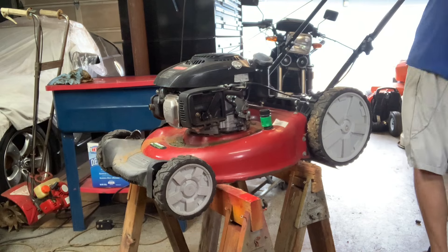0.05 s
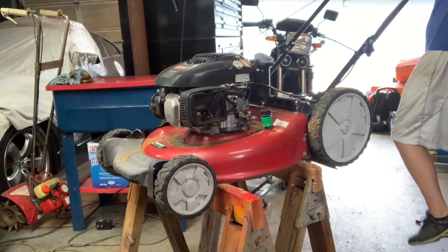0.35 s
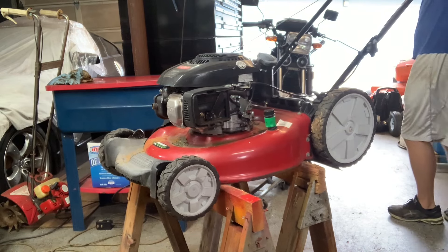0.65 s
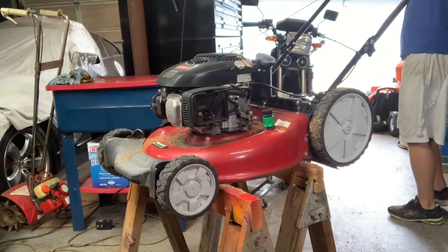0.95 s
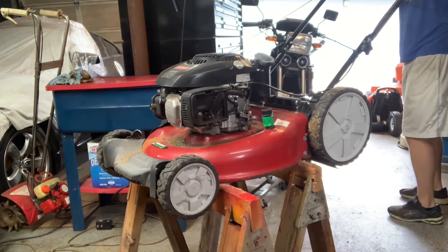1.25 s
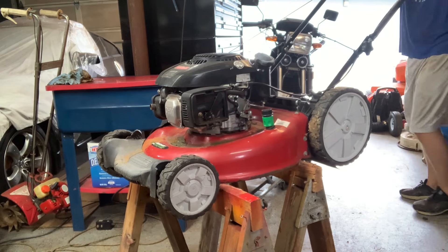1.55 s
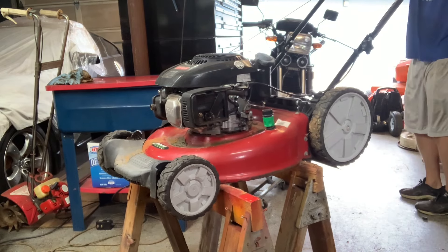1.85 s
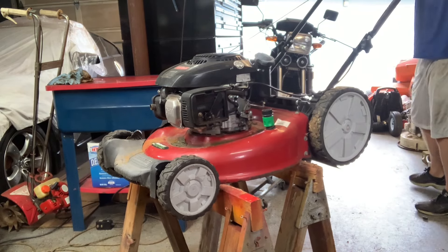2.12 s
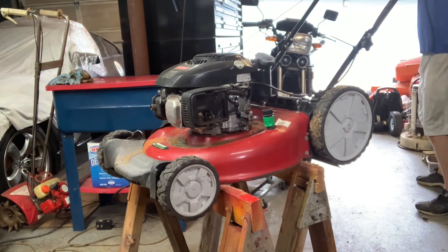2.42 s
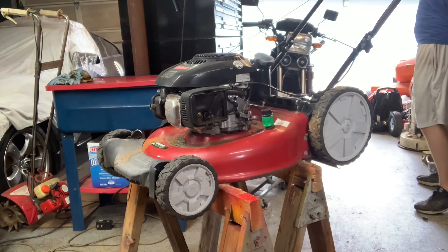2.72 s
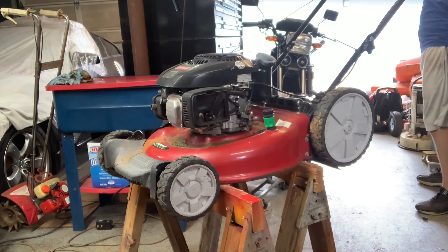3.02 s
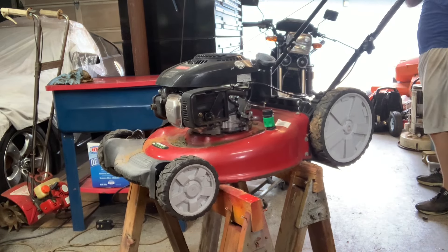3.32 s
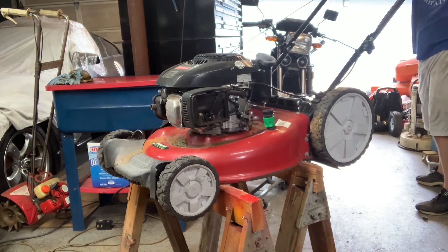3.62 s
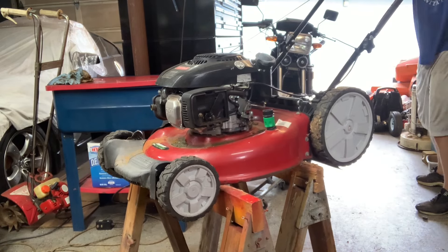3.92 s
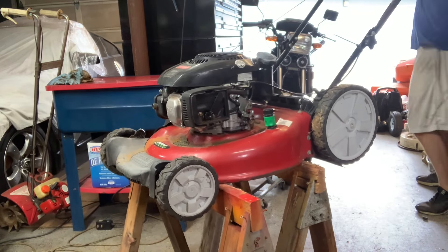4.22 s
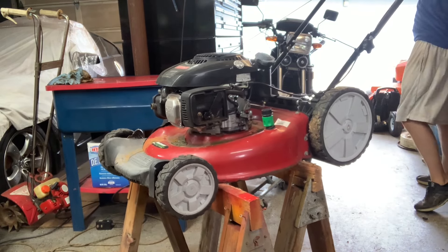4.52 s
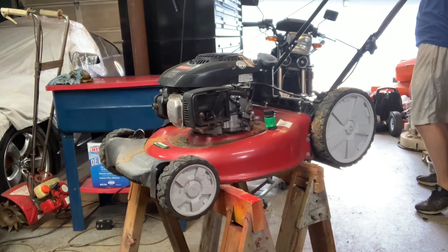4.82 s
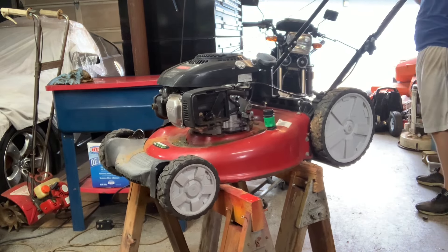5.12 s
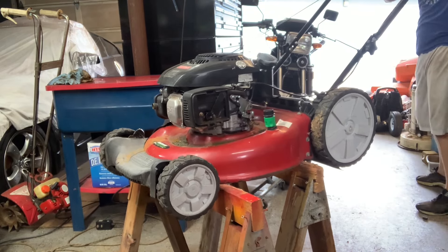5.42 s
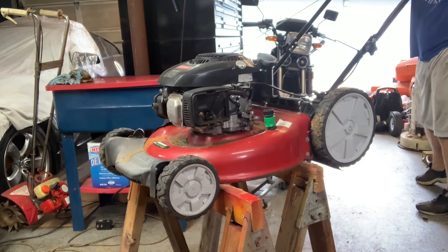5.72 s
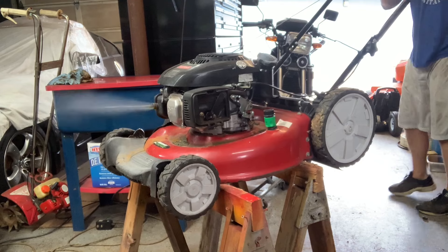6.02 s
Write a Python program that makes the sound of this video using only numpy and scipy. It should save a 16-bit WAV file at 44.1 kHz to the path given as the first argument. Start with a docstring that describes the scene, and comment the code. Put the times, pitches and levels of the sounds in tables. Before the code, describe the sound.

In a garage, feet shuffle softly while a push mower's handle bar squeaks and clacks. A pull on the starter rope spins the small engine through a few rasping, knocking turns before it coasts to a stop. With a sharp click, a second pull follows; the engine fires and speeds up, puffing and rattling its steel deck. It sounds close, with a short room echo and a faint low drone.

```python
"""A push mower on sawhorses in a garage, over a low drone. Hands and feet shuffle; the safety bail
squeaks and clacks against the handle. At 2.5 s a rope pull spins the engine, which coasts to a stop.
At 4 s the starter catches again; on the second pull the engine fires and gathers speed.
Each turn brings knocks at fixed crank angles, a puff of gas and a rasp. The shaking grows with speed,
and the steel deck rings."""
import sys
import numpy as np
from scipy import signal
from scipy.fft import rfft, irfft, next_fast_len
from scipy.io import wavfile
from scipy.ndimage import uniform_filter1d

SR = 44100
rng = np.random.default_rng(int(sys.argv[2]) if len(sys.argv) > 2 else 0)


def write(x):
    x = np.atleast_2d(x).T
    wavfile.write(sys.argv[1], SR, np.round(np.clip(x, -1, 1) * 32767).astype(np.int16))


N = 271215

# Crankshaft turns. Each row: end in seconds, strength in dB.
TURNS = [(2.4, -41), (2.5708, -20.5), (2.732, -18.5), (2.9136, -23), (3.166, -29), (3.542, -38.5),
         (4.135, -30.5), (4.3075, -20), (4.4484, -18), (4.6162, -20.5), (4.797, -22.5), (4.9867, -22),
         (5.157, -18.5), (5.3041, -18.5), (5.448, -19), (5.602, -18.5), (5.701, -16), (5.8, -18),
         (5.8936, -17), (5.9793, -17), (6.0595, -16.5), (6.138, -18.5)]
# Knocks in a turn. Each row: share of the turn, relative level in dB, pitch in Hz, relative thud in dB.
KNOCKS = [(.14, -16, 616, -17), (.37, -4, 1423, -11), (.63, -8.5, 602, -9.5), (.868, -1, 950, -8)]
# Hard compression strokes. Each row: time in seconds, clatter in dB, exhaust in dB.
STROKES = [(2.6696, -18.5, -31), (3.045, -45, -35), (3.3783, -45, -42), (4.394, -13.5, -28),
           (4.716, -22, -25), (5.0933, -16, -21.5), (5.3862, -14, -19.5), (5.6564, -10, -21.5),
           (5.852, -9, -17.5), (6.0234, -9.5, -16)]
# Crankshaft at rest before each pull. Each entry: time in seconds.
REST_TIMES_S = [2.16, 3.93]
# Muffler modes. Each row: frequency in Hz, relative level in dB, t60 in seconds.
MUFFLER_MODES = [(71.8, 0, 0.24), (139.4, -17.5, 0.24), (208, -10.5, 0.16), (309.7, -9, 0.16)]
# Deck and shroud modes. Each row: frequency in Hz, width in Hz, twice the gain in dB.
DECK_MODES = [(277, 130, -9), (554, 56, -1.5), (760, 39, -19), (1181, 26, 4), (1404, 63, -11.5),
              (1700, 91, -5), (2310, 16, -51), (2508, 14, 7), (3093, 17, 2), (3220, 14, -18),
              (3570, 61, -36), (3820, 39, -17), (4380, 51, 7), (4870, 88, -5)]
# Rope pulls. Each row: time of full draw, rise and hold in seconds, level in dB.
PULLS = [(2.51, 0.15, 0.19, -40), (4.166, 0.13, 0.25, -38)]
# Starter pawl and valve clicks. Each row: time in seconds, level in dB, relative ring level in dB.
CLICKS = [(1.826, -34, -10), (1.891, -38, 1), (1.932, -40.5, -5), (2.4907, -29, -20), (3.987, -16.5, -2),
          (4.108, -29.5, -15), (4.232, -22.5, -14)]
# Handling and engine clunks. Each row: time in seconds, level in dB, pitch in Hz, brightness in dB.
CLUNKS = [(.011, -35.5, 670, -17), (.13, -43, 510, -7.5), (.465, -35, 637, -10.5), (.576, -19, 633.4, -5),
          (.587, -22.5, 699, -18), (0.814, -41, 1120, -1.5), (.872, -47, 1000, -2.5),
          (.954, -22, 1200, -15.5), (.963, -24, 846, -14.5), (1.006, -38, 1310, -3),
          (1.043, -30.5, 749, -17), (1.13, -44, 1050, -25), (1.309, -53.5, 630, -6), (1.616, -38, 994, -11),
          (2.034, -40.5, 773, -16.5), (2.672, -16, 1660, -14), (3.244, -42.5, 1205, 2.5),
          (4.873, -19, 758, -16.5), (5.076, -18.5, 743, -14), (5.5754, -22, 966, 3),
          (5.598, -14, 1377, -12), (5.648, -13.5, 566, -12), (5.668, -17.5, 535, -15)]
# Dry pivots and rope. Each row: start and length in seconds, pitch in Hz, scatter share, level in dB.
SQUEAKS = [(0.125, 0.025, 6480, 0.013, -32.5), (0.139, 0.062, 6380, 0.0069, -43.5),
           (0.478, 0.089, 3920, 0.032, -44.5), (0.505, 0.051, 4540, .026, -35.5),
           (0.532, 0.065, 4640, 0.017, -41), (0.885, 0.097, 1080, 0.045, -50),
           (1.376, 0.034, 1776, 0.025, -53.5), (2.241, 0.2, 3620, 0.024, -48.5),
           (3.598, 0.38, 3180, 0.13, -62)]
# Hands and feet. Each row: middle and length in seconds, level in dB.
SHUFFLES = [(.01, .1, -52.5), (0.195, 0.077, -51), (.5, 0.14, -44), (1.1, .11, -49.5),
            (1.385, 0.064, -57.5), (1.606, 0.062, -57), (1.98, 0.25, -54)]
# Low drone. Each row: time in seconds, level in dB.
DRONE_LEVELS = [(0, -53), (1.3, -55.5), (2.2, -51.5), (3.05, -45), (3.3, -50.5), (3.7, -50.5), (3.95, -57)]

# Noise spectra. Each row: frequency in Hz, relative density in dB.
THUD_SPECTRUM = [(70, -29), (135, -4), (180, -2.5), (270, 1.5), (400, -2), (540, 0), (750, -15),
                 (1500, -40)]
RATTLE_SPECTRUM = [(250, -31), (550, -0.5), (900, 4.5), (1400, -3.5), (1900, -3.5), (2500, -17),
                   (5000, -20)]
RING_SPECTRUM = [(700, -14), (1500, -2.5), (2300, -3.5), (3300, 1), (4600, -1.5), (5600, -12), (7000, -15),
                 (12000, -50)]
TREBLE_SPECTRUM = [(3000, -14), (5500, -6), (7500, -2.5), (8000, -1.5), (8600, 2), (10200, 0.5),
                   (12300, -2.5), (13800, -1.5), (15700, -7.5)]
RUMBLE_SPECTRUM = [(50, 3), (90, -8.5), (140, 5), (180, -3.5), (215, -3), (260, -1), (320, -0.5), (420, -5),
                   (600, -10.5), (1200, -35)]
SCUFF_SPECTRUM = [(250, -3.5), (400, -5), (500, 3.5), (650, -5), (1050, -9), (1500, -14.5), (1900, -16),
                  (2600, -22), (6000, -23.5), (15000, -29)]
DRONE_SPECTRUM = [(20, -20), (45, 3.5), (65, 7), (90, -7), (140, -5.5), (300, -46)]
AIR_SPECTRUM = [(80, -11), (150, 0), (330, 2.5), (700, -16), (1500, -16), (3000, -23), (8000, -29),
                (15000, -48)]
HOLLOW_SPECTRUM = [(120, -8), (250, -12), (340, 2.5), (420, -15), (520, -5), (750, -4.5), (1500, -36)]
PING_SPECTRUM = [(6500, -50), (7150, -7), (7330, -4), (7550, -5), (8200, -47)]

# Garage decay. Each row: frequency in Hz, t60 in seconds.
GARAGE_T60 = [(100, 0.78), (500, 0.16), (1500, 0.19), (4000, 0.29), (8000, 0.34), (15000, 0.23)]
# Stereo likeness. Each row: frequency in Hz, coherence from 0 to 1.
COHERENCE = [(60, .97), (400, .95), (1000, .9), (1800, .8), (2400, .62), (3500, .76), (5500, .45),
             (6500, .55), (7500, .92), (9400, .99), (10500, .88), (13300, .98), (15000, .9)]
# Stereo phase. Each row: frequency in Hz, lead of the left side in radians.
LEFT_LEAD = [(60, -.15), (400, -.17), (1700, -.35), (3000, -1.1), (3800, -.7), (5200, -1.9), (6800, -1),
             (7900, .2), (9400, 3.14), (11250, 6.2), (11650, 6.4), (13250, 9.4), (15000, 12.5),
             (15700, 12.9)]
# Stereo balance. Each row: frequency in Hz, left over right in dB.
BALANCE = [(60, 1.5), (250, 1), (1200, -2), (2200, -3), (3500, -0.5), (4800, -1.5), (8000, 0)]

CRANKING_HZ, FIRST_TURN_S, STALL_GAP_S = 6, .18, .45
KNOCK_SCATTER_OCTAVES, THUMP_LEAD_S, THUMP_HZ = 0.141, .002, 538.3
EXHAUST_LAG_S, INTAKE_LAG_S, INTAKE_TURN_SHARE = 0.0149, 0.02344, .47
RASP_TURN_SHARE = 0.052
RECOIL_DB_PER_S, CLICK_HZ = 40, 1703


def knocks():
    """Slack parts take up load at the same crank angles each turn; hard strokes add a thump."""
    rows = [(start + share * length, db + knock_db, hz * 2 ** rng.normal(0, KNOCK_SCATTER_OCTAVES), thud)
            for start, length, db in zip(*turns()) for share, knock_db, hz, thud in KNOCKS]
    rows += [(s - THUMP_LEAD_S, jolt_db(s, db) - 4, THUMP_HZ, -5) for s, db, _ in STROKES]
    s, db, pitch_hz, thud_db = np.transpose(rows)
    thud = blows(s, db + thud_db - 3, rise_s=0.0093, t60_s=0.15) * noise(THUD_SPECTRUM, 2.5)
    return thud + clanks(s, db + .5, pitch_hz, spread_octaves=1.1, t60_s=0.071)


def rasps():
    """A rub over a fixed arc ends each turn, shorter and brighter with speed."""
    t = np.arange(N) / SR
    ring, treble = np.zeros(N), np.zeros(N)
    for s, db in TURNS:
        octaves = speed_octaves(s)
        width_s = RASP_TURN_SHARE / (CRANKING_HZ * 2 ** octaves)
        near = abs(t - s) < 8 * width_s
        swell = 1 / np.cosh((t[near] - s) / width_s)
        ring[near] += amp(db - 2.5) * swell
        treble[near] += amp(db - 4.5 + 8.4 * max(octaves, -.4)) * swell ** 1.3
    return ring * noise(RING_SPECTRUM, 1.5, 4.5) + treble * noise(TREBLE_SPECTRUM, 1, 6)


def clatters():
    """Loose sheet metal chatters under each hard stroke."""
    s, db, _ = np.transpose(STROKES)
    treble = blows(s, db - 3, rise_s=0.0028, t60_s=0.13) * noise(TREBLE_SPECTRUM, 3, 3.5)
    ring = blows(s, jolt_db(s, db) - 5.5, rise_s=0.0069, t60_s=0.11) * noise(RING_SPECTRUM, 3, 2.5)
    return treble + ring


def puffs():
    """Exhaust after hard strokes, intake on the other turns; each barks and rings the muffler."""
    t = np.arange(SR // 3) / SR
    rows = [(s + EXHAUST_LAG_S, db) for s, _, db in STROKES]
    for start, length, db in zip(*turns()):
        if not any(start < s < start + length for s, _, _ in STROKES):
            intake_s = start + INTAKE_TURN_SHARE * length + INTAKE_LAG_S
            rows.append((intake_s, db - 9 + 4.7 * speed_octaves(intake_s)))
    times_s, levels_db = np.transpose(rows)
    bark_db = levels_db - 11.5 + 5.5 * speed_octaves(times_s)
    out = blows(times_s, bark_db, rise_s=0.0036, t60_s=0.24) * noise(RUMBLE_SPECTRUM, 3, 3)
    attack = 1 - np.exp(-(t / 0.012) ** 2)
    for s, db in rows:
        detunes = 1 + 0.024 * rng.standard_normal(len(MUFFLER_MODES))
        boom = sum(amp(mode_db - 60 * t / t60_s) * np.sin(2 * np.pi * hz * detune * t)
                   for (hz, mode_db, t60_s), detune in zip(MUFFLER_MODES, detunes))
        add(out[0], s - .004, amp(db + 5) * attack * boom)
    return out


def shaking():
    """Rumble, rattle and hiss grow with engine speed; the running rope adds to all three."""
    t = np.arange(N) / SR
    octaves, rope = speed_octaves(t), rope_gain(t)

    def gain(db, db_per_octave, rope_db):
        return np.hypot(amp(db + db_per_octave * octaves), amp(rope_db) * rope)

    rumble = gain(-39, 12, rope_db=-5) * amp(0.77 * wobble(40)) * noise(RUMBLE_SPECTRUM, 2, 1.5)
    rattle = gain(-39, 10, rope_db=3.5) * amp(2.3 * wobble(70)) * noise(RATTLE_SPECTRUM, 3.5, 3.5)
    fizz = noise(RING_SPECTRUM, 0, 6) + amp(-3) * noise(TREBLE_SPECTRUM, 4.5, 9)
    hiss = gain(-45, 9.5, rope_db=-1.6) * amp(3.5 * wobble(50)) * fizz
    fade_in = np.interp(t - REST_TIMES_S[0], [0, 0.15], [0, 1])
    return (rumble + rattle + hiss) * fade_in


def turns():
    """Start, length and strength of each turn; a long gap means a start from rest."""
    end_s, db = np.transpose(TURNS)
    gap_s = np.diff(end_s, prepend=0)
    length_s = np.where(gap_s < STALL_GAP_S, gap_s, FIRST_TURN_S)
    return end_s - length_s, length_s, db


def speed_octaves(s):
    """Crankshaft speed in doublings above the cranking rate."""
    end_s = np.transpose(TURNS)[0]
    moving = [((a + b) / 2, 1 / (b - a)) for a, b in zip(end_s, end_s[1:]) if b - a < STALL_GAP_S]
    points = sorted(moving + [(rest_s, .5) for rest_s in REST_TIMES_S])
    return np.log2(np.interp(s, *np.transpose(points)) / CRANKING_HZ)


def jolt_db(s, clatter_db):
    """Force of a hard stroke: midway between its clatter and the strength of its turn."""
    end_s, turn_db = np.transpose(TURNS)
    return (clatter_db + turn_db[np.searchsorted(end_s, s)]) / 2


def deck(x, ring_db, direct_db):
    """Deck and shroud resonate under every blow."""
    def modes(f):
        return sum(amp(db / 2) * 1j * f * width / (hz * hz - f * f + 1j * f * width)
                   for hz, width, db in DECK_MODES)

    return filtered(x, lambda f: amp(direct_db) + amp(ring_db) * modes(f))


def rope_gain(t):
    """Rope noise swells with the draw, holds, and fades on recoil."""
    gain = np.zeros(N)
    for s, rise_s, hold_s, db in PULLS:
        draw_db = -12 * np.maximum(s - t, 0) / rise_s
        recoil_db = -RECOIL_DB_PER_S * np.maximum(t - s - hold_s, 0)
        gain += amp(db + draw_db + recoil_db)
    return gain


def clicks():
    """Sharp metal clicks with a brief high ring, from starter pawls and valves."""
    s, db, ring_db = np.transpose(CLICKS)
    snap = strike(s, db, np.full(len(s), CLICK_HZ), bright_db=-3.5, thud_db=-9.5)
    ring = blows(s, db + ring_db - 4, rise_s=0.0008, t60_s=0.17) * noise(PING_SPECTRUM, -1)
    return snap + ring


def clunks():
    """Metal clunks: handling knocks before the pull, then engine knocks and a firing bang."""
    return strike(*np.transpose(CLUNKS), thud_db=-19.5)


def strike(s, db, pitch_hz, bright_db, thud_db):
    """Hard contact: a clank, a hollow thud and a bright splash of sheet metal."""
    clank = clanks(s, db + .5, pitch_hz, spread_octaves=1.3, t60_s=0.066)
    thud = blows(s, db + thud_db, rise_s=0.0047, t60_s=0.12) * noise(HOLLOW_SPECTRUM, 4, 1.5)
    ring = blows(s, db + bright_db - 4, rise_s=0.0011, t60_s=0.16) * noise(RING_SPECTRUM, 2, 0.5)
    splash = blows(s, db + bright_db - .5, rise_s=0.0035, t60_s=0.14) * noise(TREBLE_SPECTRUM, 4.5, 4.5)
    return clank + thud + ring + splash


def clanks(times_s, levels_db, pitches_hz, spread_octaves, t60_s, count=20):
    """Each blow excites a new cluster of damped steel modes, strongest near its pitch."""
    t = np.arange(SR // 10) / SR
    envelope = (1 - np.exp(-t / 0.0025)) * amp(-60 * t / t60_s)
    out = np.zeros((2, N))
    for s, db, pitch_hz in zip(times_s, levels_db, pitches_hz):
        offsets = np.linspace(-1, 1, count) + rng.normal(0, 1 / count, count)
        hz = pitch_hz * 2 ** (spread_octaves * offsets)
        modes = np.sin(2 * np.pi * (hz[:, None] * t + rng.random((2, count, 1))), dtype="f")
        weights = 1 / (1 + (2.4 * offsets) ** 2)
        ring = envelope * (weights @ modes)
        ring *= np.linalg.norm(envelope) / np.linalg.norm(ring, axis=1, keepdims=True)
        add(out, s - .002, amp(db) * ring)
    return out


def squeaks():
    """Stick and slip: a short ragged tone with its octave."""
    out = np.zeros((2, N))
    for s, length_s, pitch_hz, scatter, db in SQUEAKS:
        n = int(length_s * SR)
        phase = 2 * np.pi * np.cumsum(pitch_hz * (1 + scatter * wobble(1500)[:n])) / SR
        grip = np.sin(np.linspace(0, np.pi, n)) * amp(2.8 * wobble(305)[:n])
        add(out[0], s, amp(db - 0.5) * grip * (np.sin(phase) + amp(-10) * np.sin(2 * phase)))
    return out


def shuffles():
    """Hands and feet scuff before the first pull."""
    t = np.arange(N) / SR
    moves = sum(amp(db) / np.cosh(2 * np.clip((t - s) / length_s, -20, 20))
                for s, length_s, db in SHUFFLES)
    return moves * amp(0.84 * wobble(33.76)) * noise(SCUFF_SPECTRUM, 0, 7)


def background():
    """A low wavering drone and faint air."""
    drone_db = np.interp(np.arange(N) / SR, *np.transpose(DRONE_LEVELS))
    drone = amp(drone_db + 1.5 * wobble(5.23)) * noise(DRONE_SPECTRUM, 2)
    air = amp(-58 + wobble(7.87)) * noise(AIR_SPECTRUM, 0.5, 1.5)
    return drone + air


def garage(x, early_db, tail_db):
    """Early reflections off near surfaces, then a tail with frequency-dependent decay."""
    hz, t, bins = signal.stft(rng.standard_normal((2, SR // 2)), SR, nperseg=256)
    tail = signal.istft(bins * amp(-60 * t / log_interp(GARAGE_T60, hz)[:, None]), SR, nperseg=256)[1]
    early = rng.standard_normal(tail.shape) * amp(-60 * np.arange(tail.shape[1]) / SR / 0.028)
    echo = amp(early_db) * early / np.linalg.norm(early[0])
    echo += amp(tail_db) * tail / np.linalg.norm(tail[0])
    wet = signal.fftconvolve(x, np.pad(echo, ((0, 0), (60, 0))), axes=1)[:, :N]
    return (x + wet) / np.sqrt(1 + amp(early_db) ** 2 + amp(tail_db) ** 2)


def stereo(x):
    """Row 0 as mid, row 1 as side, to left and right with phase and level offsets."""
    def split(hz):
        angle = np.arccos(np.clip(log_interp(COHERENCE, hz), 0, 1)) / 2
        return np.array([np.cos(angle), np.sin(angle)])

    def offsets(hz):
        half = np.array([[.5], [-.5]])
        return amp(half * log_interp(BALANCE, hz)) * np.exp(1j * half * log_interp(LEFT_LEAD, hz))

    mid, side = filtered(x, split)
    return filtered(np.array([mid + side, mid - side]), offsets)


def noise(spectrum, grain_db, ringing_db=0):
    """Two coloured noises, rms 1; grain_db breaks them into tiny contacts, ringing_db adds brief rings."""
    shape = (257, N // 256 + 3)  # frequency bins, frames
    patches = uniform_filter1d(rng.standard_normal(shape, "f"), size=2, axis=0)
    patches = uniform_filter1d(patches, size=5, axis=1)
    bins = rng.standard_normal((2, *shape, 2), "f").view("F")[..., 0]
    ringing = signal.istft(bins * amp(ringing_db * unit_rms(patches)))[1][:, :N]
    grains = ringing * amp(grain_db * wobble(900))
    return unit_rms(filtered(grains, lambda hz: amp(log_interp(spectrum, hz))))


def blows(times_s, levels_db, rise_s, t60_s):
    """Envelope of quickly rising, decaying blows, summed in power."""
    t = np.arange(SR // 3) / SR
    shape = (1 - np.exp(-(t / rise_s) ** 2)) * amp(-60 * t / t60_s)
    power = np.zeros(N)
    for s, db in zip(times_s, levels_db):
        add(power, s - rise_s / 2, (amp(db) * shape / shape.max()) ** 2)
    return np.sqrt(power)


def wobble(rate_hz):
    """Random curve through Gaussian knots."""
    knots = rng.standard_normal(int(N * rate_hz / SR) + 4)
    return np.interp(np.arange(N) * rate_hz / SR, np.arange(len(knots)), knots)


def filtered(x, response):
    """Applies a complex frequency response."""
    size = next_fast_len(N + 8192, True)
    gains = response(np.fft.rfftfreq(size, 1 / SR)).astype("F")
    return irfft(rfft(x.astype("f"), size) * gains, size)[..., :N]


def add(track, start_s, sound):
    start = max(int(start_s * SR), 0)
    part = track[..., start:start + sound.shape[-1]]
    part += sound[..., :part.shape[-1]]


def log_interp(points, hz):
    knots_hz, values = np.transpose(points)
    return np.interp(np.log(hz + 1), np.log(knots_hz + 1), values)


def unit_rms(x):
    return x / np.sqrt(np.mean(x ** 2) + 1e-20)


def amp(db):
    return 10 ** (np.asarray(db) / 20)


def scene():
    """Metal through the deck and, with the squeaks, the garage; gas and background stay dry."""
    metal = deck(rasps() + knocks() + clatters() + clunks() + clicks() + shaking(),
                 ring_db=-3, direct_db=-2)
    reverberant = garage(metal + squeaks(), early_db=-5.5, tail_db=-7.5)
    return stereo(reverberant + puffs() + shuffles() + background())


def record(dry):
    """Band limit: roll-off below 40 Hz, hard cut at 15.8 kHz."""
    return filtered(dry, lambda hz: (hz < 15800) * (1 - 1 / (1 + (hz / 40) ** 6)))


dry = scene()
out = record(dry)
write(out)
```